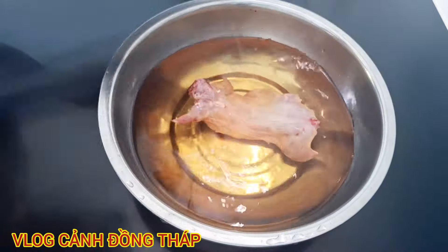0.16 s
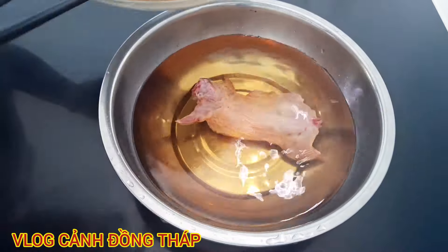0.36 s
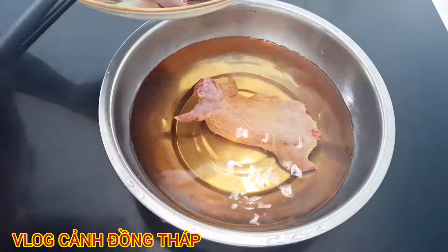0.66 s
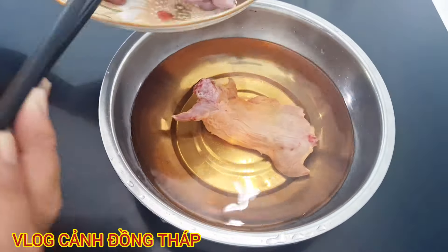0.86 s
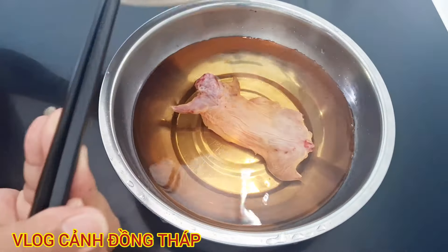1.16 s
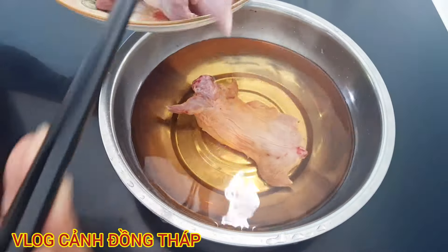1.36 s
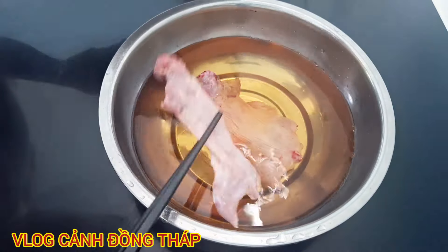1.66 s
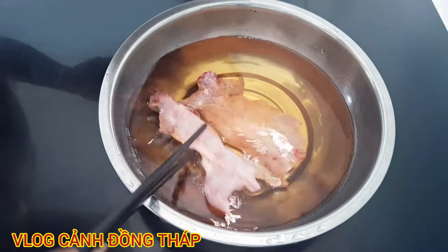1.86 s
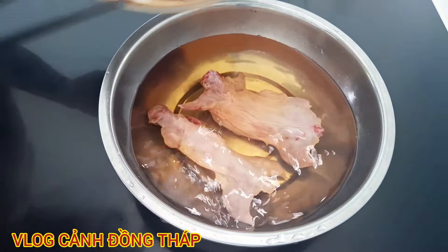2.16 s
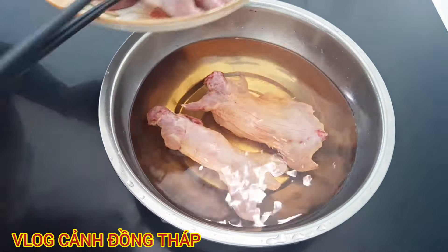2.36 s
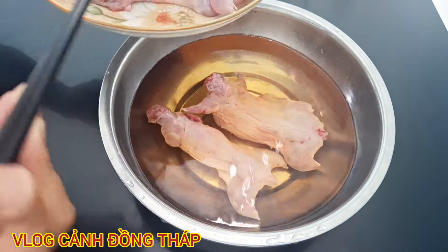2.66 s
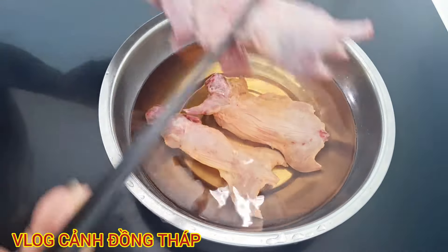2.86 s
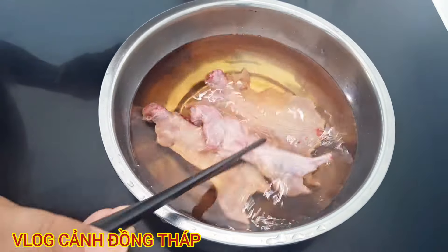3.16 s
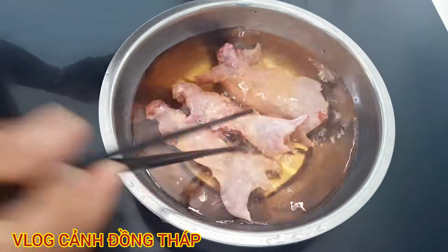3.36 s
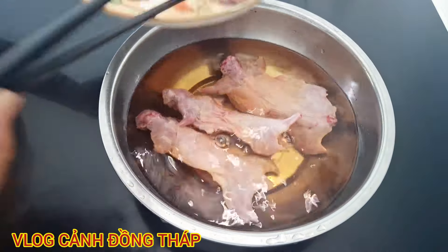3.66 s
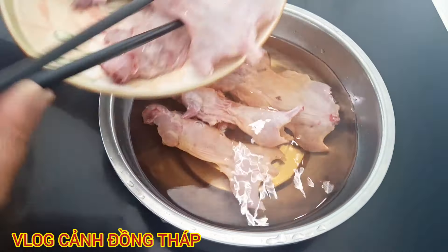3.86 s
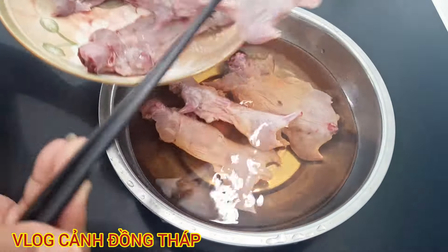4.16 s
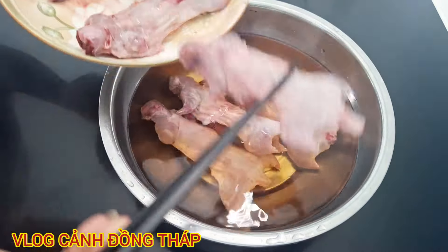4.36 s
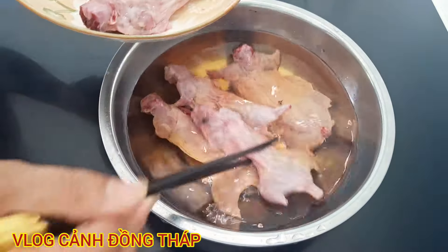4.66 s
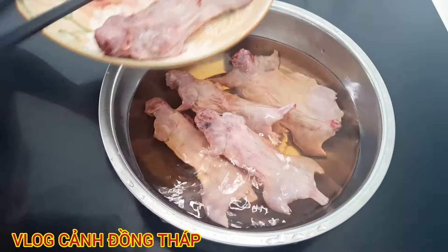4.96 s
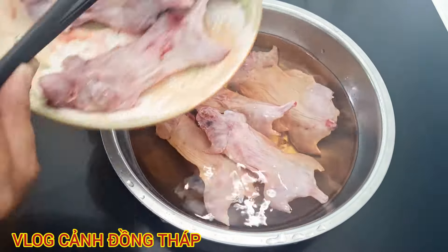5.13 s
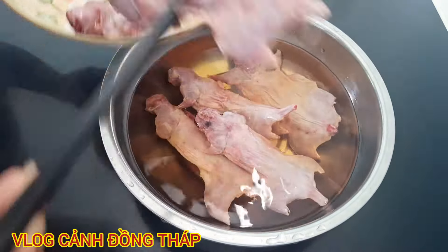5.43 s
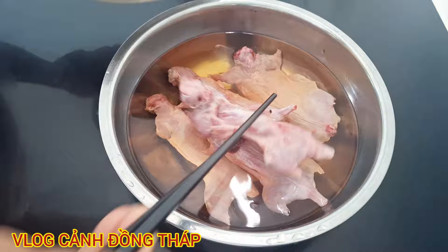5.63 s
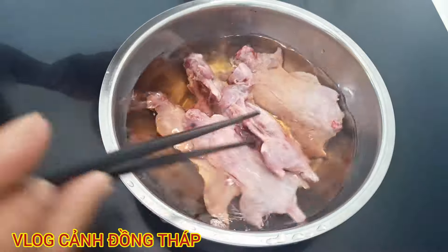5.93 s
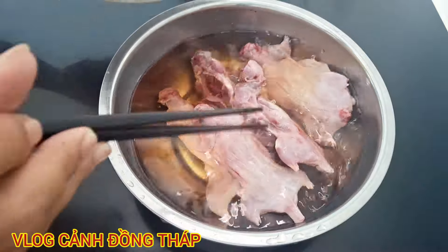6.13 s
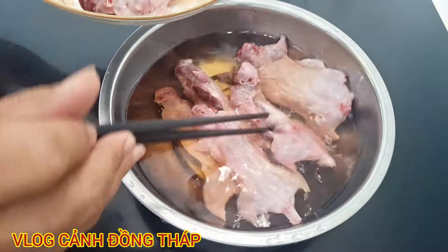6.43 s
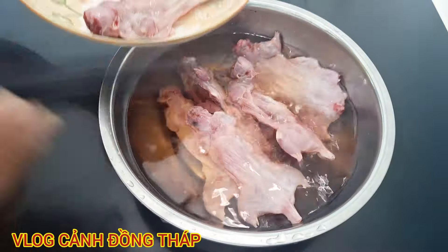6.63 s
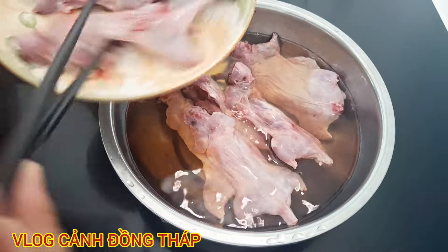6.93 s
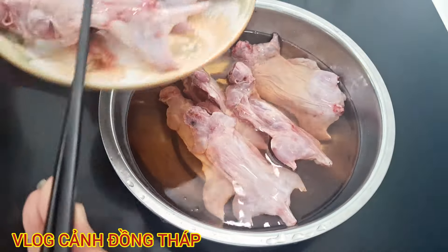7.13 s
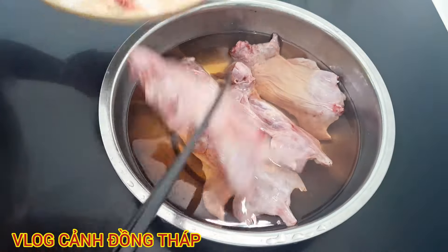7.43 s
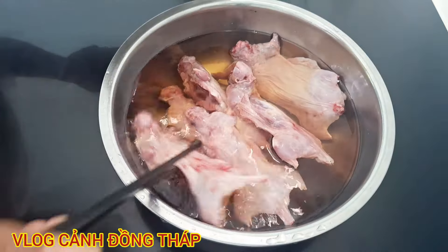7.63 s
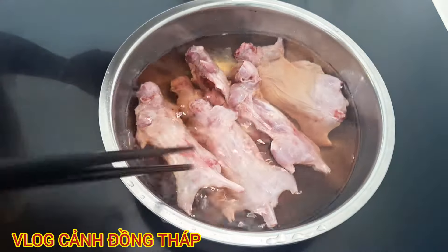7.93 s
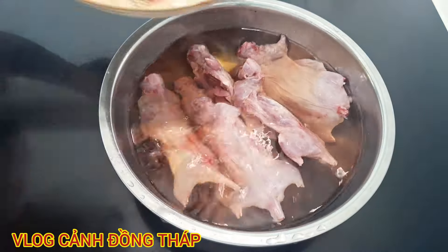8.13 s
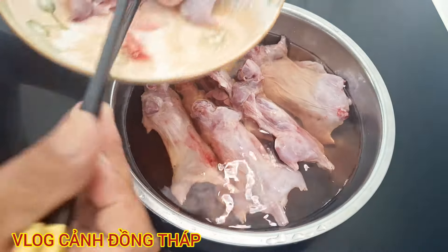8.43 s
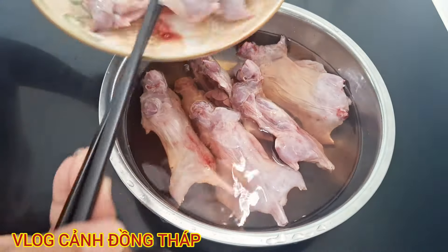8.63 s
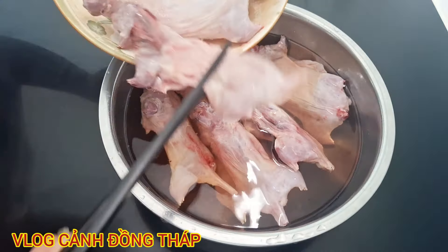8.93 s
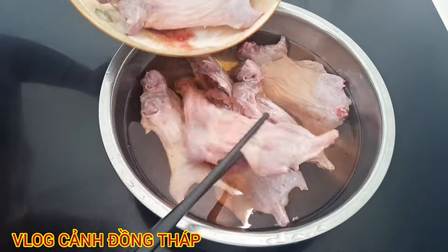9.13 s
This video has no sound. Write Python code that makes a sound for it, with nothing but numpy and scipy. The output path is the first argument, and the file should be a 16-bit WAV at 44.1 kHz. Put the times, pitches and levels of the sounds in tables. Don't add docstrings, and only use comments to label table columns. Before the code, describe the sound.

Close view of a quiet, bare kitchen. Short, bright ceramic clinks come irregularly, the strongest chattering and skidding briefly. Much fainter wet ticks, tiny clicks of stick on stick and soft rubbing of meat fill the gaps, busiest just before eight seconds with a slight steel ring, then small bubble blips. Low hum, thin whine and distant rumble continue underneath.

```python
import sys
import numpy as np
from scipy import signal
from scipy.fft import rfft, irfft, next_fast_len
from scipy.io import wavfile
from scipy.ndimage import map_coordinates

SR = 44100
rng = np.random.default_rng(int(sys.argv[2]) if len(sys.argv) > 2 else 0)


def materialize(psi):
    bounded = np.clip(np.atleast_2d(psi).T, -1, 1)
    quanta = np.round(bounded * 32767).astype(np.int16)
    wavfile.write(sys.argv[1], SR, quanta)


def boost(x):
    u = np.asarray(x, float) / 20
    return 10 ** u


N = 409688

# (time [s], peak level [dB], 1.8 kHz family [dB], 3 kHz family [dB], 4 kHz family [dB])
TAPS = [(0.464, -24.5, -12.5, -10.5, -8.5), (2.2731, -17, -20.5, -7, -9.5), (2.29, -33, -2, -8.5, -19),
        (2.3217, -31, -21, -3, -15), (2.4705, -30.5, -22, -9, -17), (3.996, -60, -16, -17, -13),
        (4.154, -61, 1, -4, -7), (4.468, -48, -30.5, -29.5, -14), (6.8963, -17.5, -42, 2, -13.5),
        (7.1188, -23, -3.5, -7, -6), (7.1313, -40.5, 11, -27, -3), (8.6617, -46, 11, 13.5, 0.5),
        (8.6737, -58.5, 25.5, -13, -17), (8.8666, -58.5, 0, -3, -21), (8.9121, -54, 4, -2, -8)]
# (5 kHz [dB], 6 kHz [dB], 7.5 kHz [dB], treble [dB], upper twin [dB])
TAP_FAMILIES = [(-6, 1, 0.5, -8.5, 3.5), (-11.5, -2, -4, -2.5, -3.5), (-14.5, 2.5, 3, -6.5, -4),
                (-12, -5.5, -6.5, -4, -5), (-14, -6, -6, -16, 5.5), (-9, -2, 0, -8, 0),
                (-9, 4, -3, -13, -2), (-10.5, 2.5, 1.5, -6, 2), (-16.5, -2, 2.5, -4, 3.5),
                (-14.5, 1, -6.5, -4.5, 2), (-5, -3, 3.5, -7, -2), (-6, 8.5, 3, 5.5, 2.5),
                (-5, 4, -4, -9, 1), (-10.5, -1, 0, -1, 4.5), (-11, 1, 3, -4, 3.5)]
# (frequency [Hz], level [dB], T60 [s], twin weight [negative lower, positive upper])
PLATE_MODES = [(955, -40, 0.043, 0.5), (1190, -36.5, 0.12, -3), (1322, -25, 0.023, 1),
               (1775, -5.5, 0.048, -0.5), (1856, -5.5, 0.045, -0.5), (2030, -34.5, 0.074, 2),
               (2300, -24.5, 0.042, 0), (2500, -22.5, .04, -2), (2825, -23.5, 0.018, 0.5),
               (3007, -14.5, 0.085, 0), (3113, -6.5, 0.098, 0), (3460, -15.5, 0.02, 2),
               (3655, -20.5, 0.055, -2.5), (4015, 7, 0.055, 0), (4023, -0.5, 0.046, -0.5),
               (4170, -5, .04, -2), (4370, -19, .06, -0.5), (4860, -6.5, .04, 1.5), (5065, -2.5, .05, -1.5),
               (5130, -2, 0.059, 1.1), (5230, -3.5, 0.11, 1), (5870, -14, .04, 1), (5540, -17.5, .03, -.5),
               (6080, -8.5, 0.029, 0), (6338, -3, 0.018, 0.5), (6410, -8.5, .05, 1.5),
               (6650, -18.5, 0.046, -0.5), (7050, -14, 0.03, 2), (7380, -17, .04, -2.5),
               (7500, -15.5, 0.074, -1.5), (7640, -16, 0.07, 1.5), (7734, -13.5, 0.1, 0),
               (8000, -30, .05, 0.5), (8630, -24.5, 0.034, 0), (9210, -18, 0.04, -1.5),
               (10200, -28.5, 0.022, -2.5), (10300, -28, .04, 1.5), (10800, -21.5, 0.044, 0.5),
               (11340, -20.5, .04, 0.5), (11560, -28, .03, 0), (12460, -17, 0.035, 0),
               (12900, -23, .035, -.5), (14200, -24.5, .02, 0), (15280, -32, 0.044, 1)]
# (lower edge [Hz], upper edge [Hz])
FAMILIES = [(1600, 2000), (2850, 3250), (3800, 4300), (4800, 5900), (6000, 6600), (7200, 8000),
            (8000, 16000), (2850, 3030)]
# (time [s], length [s], level [dB], 3 kHz family [dB], 4 kHz family [dB])
DRAGS = [
    (0.544, 0.02, -40, -1, -2.5),
    (2.286, 0.033, -42, -4, -10),
    (2.295, 0.039, -44, 5.5, 2),
    (2.335, 0.057, -48, 4.5, -37),
    (2.41, 0.086, -63, -9, 12),
]
# (1.8 kHz [dB], 5 kHz [dB], treble [dB], lower 3 kHz twin [dB], upper twin [dB])
DRAG_FAMILIES = [(-6.5, -1, -6, 14, -0.5), (-3.5, -8, 5, 2, 4.5), (-4, 2, 2.5, 0, -1), (-2, -12, 0, 1, 2.5),
                 (-2.5, -7, -2, 1, 4)]
# (time [s], peak level [dB])
THUMPS = [
    (0.464, -59),
    (0.555, -58),
    (2.274, -52.5),
    (2.299, -50.5),
    (2.329, -66.5),
    (4.156, -60.5),
    (6.896, -50),
    (7.118, -55),
    (8.662, -51.5),
    (8.915, -61),
]
# (time [s], peak level [dB])
RIM_TAPS = [
    (8.4032, -18.5),
]
# (frequency [Hz], level [dB], T60 [s])
RIM_MODES = [(1840, -20.5, 0.08), (2590, -29.5, 0.13), (3124, -8, 0.052), (3430, -13.5, 0.03),
             (4200, -22, 0.046), (4920, -6.5, 0.029), (5230, -2, 0.04), (6140, -27, .05),
             (6450, -22, 0.065), (7050, -21, .06), (7480, -10, 0.032), (8650, -29, 0.07), (10320, -28, .03),
             (11400, -20.5, 0.032), (12800, -23, 0.049), (15300, -26, .03)]
# (time [s], peak level [dB], centre [Hz], width [octaves])
RATTLE = [(0.003, -53.5, 620, 0.74), (0.556, -41, 1110, 3.2), (2.287, -32.5, 3485, 2.6),
          (2.2882, -32, 2300, 4.3), (2.293, -34, 4970, 2.4), (2.2988, -29.5, 3930, 1.8),
          (2.3035, -30.5, 3500, 3.5), (2.3062, -34, 5040, 1.9), (2.317, -37, 3630, 1.9),
          (2.322, -31.5, 4480, 1.3), (2.323, -28.5, 5190, 1.5), (2.328, -32.5, 4600, 1.6),
          (2.333, -34.5, 4500, 0.97), (2.345, -34, 2210, 1.8), (2.348, -31, 2980, 2.2),
          (2.367, -40, 2500, 2.7), (4.156, -53.5, 1660, 2.1)]
# (time [s], peak level [dB], centre [Hz], width [octaves])
TICKS = [(1.035, -53, 7320, 0.78), (1.1155, -55, 4560, 2.2), (2.0583, -48, 6900, 0.59),
         (3.1535, -43.5, 6500, 1.5), (3.165, -47, 4200, 1.2), (3.164, -42, 13500, 1),
         (3.198, -55, 7300, 0.44), (3.206, -45, 5930, 1.2), (3.2125, -51, 5900, 0.91),
         (3.239, -62, 6300, .3), (3.3718, -60, 6190, 0.52), (4.0377, -55, 6950, 0.54),
         (4.089, -54, 5070, 1.2), (4.6058, -49, 6440, 0.99), (4.655, -41, 5400, 1.3), (4.665, -49, 4500, 2),
         (4.735, -58, 5500, 1.5), (7.6961, -56, 4400, .6), (7.825, -31.5, 2940, 2.3),
         (7.951, -44, 4230, 0.8), (6.347, -49.5, 5760, 0.56), (7.6322, -36, 5450, 3),
         (7.649, -49, 6950, 0.77), (7.711, -36, 7000, 1), (7.7155, -34.5, 6900, 0.51),
         (7.776, -46, 6950, 0.61), (8.55, -56, 6300, .5), (8.175, -55, 3000, 0.99),
         (7.8236, -30, 6600, 2.4), (7.874, -44, 7380, 1.3), (7.9527, -37, 7000, 1),
         (7.959, -38, 7200, 0.77), (8.1037, -46, 6670, 1.3), (3.8464, -50, 5400, 0.99),
         (3.366, -54, 4500, 2.5), (0.945, -57, 7500, 0.83), (8.6615, -34, 2120, 1.7)]
# (time [s], peak level [dB], centre [Hz])
SPITS = [(0.807, -51, 12100), (1.042, -62, 11500), (1.26, -59, 11600), (1.8831, -58.5, 11400),
         (3.1794, -47.5, 11200), (3.204, -52, 15000), (3.242, -55, 12100), (3.414, -57.5, 9500),
         (3.6553, -63, 15300), (3.916, -59, 15000), (4.2243, -57, 11600), (4.6059, -52, 12540),
         (4.654, -53, 11400), (4.6937, -50, 9450), (5.2335, -65.5, 10970), (6.3131, -49, 11400),
         (6.5194, -50, 9800), (7.9097, -49, 11600)]
# (time [s], peak level [dB], centre [Hz])
KNOCKS = [
    (0.9373, -57, 3700),
    (3.204, -46.5, 3450),
    (4.357, -57, 4000),
    (4.662, -51, 4030),
    (5.5188, -59.5, 4900),
    (5.886, -46, 4400),
    (5.9185, -40.5, 3700),
    (6.3203, -48, 4180),
]
# (frequency [Hz], gain [dB])
CAPSULE = [(20, 3), (7900, -1), (8400, -11), (15300, 0.5), (15800, -22), (20000, -47)]
# (time [s], length [s], level [dB])
PEELING = [(0.79, 0.14, -76), (1.021, 0.04, -76), (2.248, .012, -74), (3.16, 0.065, -75),
           (3.187, 0.11, -83), (3.905, 0.071, -78), (4.652, 0.067, -62.5), (4.7, 0.095, -82),
           (7.628, .04, -61), (7.847, 0.085, -70), (4.6, .02, -70)]
# (time [s], length [s], level [dB])
PRESSING = [(0.0, 0.029, -67), (1.752, 0.11, -77), (1.872, 0.1, -70), (2.12, 0.14, -88),
            (3.847, 0.045, -85), (4.214, 0.13, -77), (4.599, 0.02, -58), (4.688, 0.15, -79),
            (4.86, 0.54, -80.5), (5.754, 0.18, -89), (5.812, 0.03, -67.5), (5.877, 0.073, -62),
            (5.961, 0.09, -71.5), (6.802, 0.064, -77), (8.183, 0.57, -78.5)]
# (time [s], level [dB])
PRODS = [
    (6.09, -65.5),
    (6.192, -73),
    (6.28, -69),
    (6.438, -68),
    (6.5, -68.5),
    (6.581, -66.5),
    (6.678, -65.5),
]
# (time [s], length [s], level [dB])
SLIDING = [
    (0.39, 0.089, -94),
    (2.045, 0.041, -57),
    (7.709, 0.021, -51),
    (7.743, 0.068, -54),
    (7.822, 0.016, -42.5),
    (7.95, 0.024, -54),
    (7.98, 0.051, -68),
    (8.108, 0.063, -64.5),
]
# (frequency [Hz], density [dB per Hz])
PEEL_SPECTRUM = [(1470, -20.5), (2800, -14.5), (3600, -4), (5200, -0.5), (6750, 1.5), (8000, -7.5),
                 (11000, -43.5), (18700, -120)]
PRESS_SPECTRUM = [(1470, -21), (2500, -13), (3560, -5.5), (5600, -12.5), (6750, -1.5), (8500, -18),
                  (11000, -46.5), (18700, -120)]
SLIDE_SPECTRUM = [(1470, -26), (3000, -13), (4200, -3.5), (5600, -15), (6700, -4), (7300, -2.5),
                  (8300, -19), (11000, -38.5), (18700, -120)]
FIZZ_SPECTRUM = [(5000, -52.5), (8500, -19.5), (10300, -1), (11600, 7.5), (15500, -11.5), (16000, -15)]
# (time [s], level [dB], floor over wall [dB])
BOWL_TAPS = [
    (7.712, -54.5, -6),
    (7.75, -60, 3),
    (7.766, -60, 9),
    (7.829, -66, -6),
]
# (frequency [Hz], level [dB], T60 [s], side [-1 wall to 1 floor])
BOWL_MODES = [(2816, -1, 0.12, 0), (3460, -7.5, 0.098, -1), (3900, -6, 0.15, -.5), (4640, -7, 0.18, 1),
              (5400, -14, 0.14, -1), (6620, -2, .2, .6), (7200, 3, 0.17, .6)]
# (time [s], peak level [dB], frequency [Hz], rise [octaves], T60 [s])
BUBBLES = [
    (.395, -76, 6850, .4, .5),
    (8.595, -62, 1200, .05, .03),
    (3.263, -58, 1400, 2.5, .11),
    (3.365, -64, 2100, 2.2, .1),
    (8.175, -47, 2180, .02, .045),
    (8.175, -54, 1050, .02, .035),
    (8.13, -61, 1650, .05, .05),
    (4.603, -55, 1300, .05, .025),
    (7.823, -48, 1300, .6, .02),
    (7.632, -55, 1500, .3, .015),
]
# (frequency [Hz], gain [dB])
WALLS = [(400, 6.5), (1800, 0), (3000, -3.5), (5000, -4.5), (7500, -3.5), (12000, 0.5), (16000, -1.5)]
# (frequency [Hz], T60 [s])
REVERBERATION = [(500, .6), (1500, 0.81), (4000, 0.7), (9000, 0.6), (15000, 0.26)]
# (time [s], length [s], level [dB])
HUM = [
    (0.312, 1, -73.5),
    (1.688, 1.32, -73.5),
    (3.124, 1.04, -67),
    (4.22, 0.66, -73),
    (4.97, 1.3, -72),
    (6.328, 0.48, -66.5),
    (7, 0.84, -76),
    (7.98, 0.38, -75),
    (8.5, 0.93, -78),
]
# (frequency [Hz], rms level [dB])
WHINE = [(3731, -93.5), (3822, -92.5), (3871, -92), (3908, -82.5), (4000, -85.5), (4091, -90),
         (4183, -91.5), (4274, -77.5)]
# (frequency [Hz], width [Hz], level [dB])
HOUSING = [(3770, 310, -2.5), (4180, 160, 2)]
# (time [s], level [dB])
RUMBLE_LEVEL = [(0.0, -69.5), (2.14, -68), (3.15, -71), (3.72, -67.5), (5.3, -70), (5.82, -67),
                (7.12, -67.5), (7.5, -68.5), (8.64, -70), (9.29, -67.5)]
# (frequency [Hz], density [dB per Hz])
RUMBLE = [(12, -62.5), (20, -25), (45, -3), (64, 1.5), (146, -3), (183, -6), (219, -8.5), (289, -17.5),
          (350, -17.5), (460, -43), (770, -120)]
AIR = [(150, -37), (250, -3.5), (291, -13), (413, -1), (441, -5.5), (481, -1.5), (619, -9.5), (1470, -7),
       (3400, -18), (4420, -53), (7480, -120)]
HISS = [(1760, -50), (3000, -35), (3580, -13.5), (3770, -6), (4250, -5.5), (4430, -8), (4530, -5),
        (5110, -18.5), (7240, -13.5), (8710, -31), (10100, -33), (11600, -23.5), (12500, -32), (15400, -27),
        (16400, -47)]
# (frequency [Hz], left over right [dB])
PORTS = [(40, 1), (180, -3), (400, 0.5), (4400, 0.5), (6000, 2.5), (7200, 9.5), (8000, 10), (8800, -2.5),
         (10000, -8.5), (11800, -6.5), (13000, 3.5)]
# (frequency [Hz], level [dB])
APART = [(30, -24), (200, -15), (500, -20), (1200, -28), (4500, -41.5), (6000, -18.5), (8000, -5.5),
         (10000, -1), (11800, -4), (12600, -19), (15000, -25.5)]

THUMP_HZ, HUM_HZ, MOTOR_TURNS_HZ = 637, 184, 45.5
TICK_T60, SPIT_T60, KNOCK_T60, RATTLE_T60 = 0.026, 0.0166, 0.013, 0.018
SPIT_OCTAVES, KNOCK_OCTAVES = 0.45, 0.54
RATTLE_DULL_DB, RATTLE_DAMPING = -17, 1.6
PROD_S = 0.099
PEEL_FIZZ_DB, PRESS_FIZZ_DB, SLIDE_FIZZ_DB = -8, -14.5, -18.5
HUM_EDGE_S, HUM_FADE_DB = 0.11, 1
AIR_DB, HISS_DB = -69, -77


def unit(x):
    return x / np.sqrt(np.mean(x ** 2) + 1e-20)


def along(points, hz):
    f, v = np.transpose(points)
    return np.interp(np.log(hz + 1), np.log(f + 1), v)


def wobble(rate):
    knots = rng.standard_normal(int(N * rate / SR) + 4)
    return map_coordinates(knots, [np.arange(N) * rate / SR])


def filtered(x, response):
    m = next_fast_len(x.shape[-1] + 4096)
    spectrum = rfft(x, m) * response(np.fft.rfftfreq(m, 1 / SR))
    return irfft(spectrum, m)[..., :x.shape[-1]]


def noise(spectrum, source=None):
    if source is None:
        source = rng.standard_normal(N)
    return unit(filtered(source, lambda hz: boost(along(spectrum, hz))))


def resonances(peaks):
    def response(f):
        total = 0
        for k, (centre, width, db) in enumerate(peaks):
            loss = 1j * f * width
            total = total + (-1) ** k * boost(db) * loss / (centre * centre - f * f + loss)
        return total
    return response


def add(track, s, sound):
    part = track[round(s * SR):][:len(sound)]
    part += sound[:len(part)]


def ring(hz, db, t60, rise=0.0014, scatter_db=0.7, wash_db=0.0, dip_db=9):
    t = np.arange(SR // 5) / SR
    db = db + scatter_db * rng.standard_normal(len(hz))
    phase = hz[:, None] * t + rng.random((len(hz), 1))
    modes = boost(db[:, None] - 60 * t / t60[:, None]) * np.sin(2 * np.pi * phase)
    modes *= 1 - np.exp(-t * hz[:, None] / 2.0)
    wash_level = 0.64 * db + 0.28 * db.max() - 1.9 * (hz > 8000)
    outline = [(400, db[0] - 11.0), *zip(hz, wash_level), (16500, db[-1] - 13.5)]
    wash = filtered(rng.standard_normal(len(t)), lambda f: boost(along(outline, f)))
    wash *= boost(wash_db - 60 * t / 0.077)
    dip = boost(-dip_db / (1 + np.exp((0.011 - t) / 0.0021)))
    return (modes.sum(axis=0) + wash) * (1 - np.exp(-(t / rise) ** 2)) * dip


def plate_taps(hz, level, t60, twin, member):
    out = np.zeros(N)
    for (s, db, *low), (*high, twin_db) in zip(TAPS, TAP_FAMILIES):
        spot = twin_db * twin + (low + high) @ member[:-1]
        add(out, s - 0.0012, ring(hz, db + 1.0 + level + spot, t60))
    return out


def plate_drags(hz, level, t60, twin, member):
    out = np.zeros(N)
    for (s, length, db, *middle), (low, *high, twin_db) in zip(DRAGS, DRAG_FAMILIES):
        count = round(length * SR)
        slips = np.hanning(count) * rng.standard_normal(count) ** 3
        spot = twin_db * twin + [low, *middle, *high] @ member[[0, 1, 2, 3, 6, 7]]
        sound = signal.fftconvolve(slips, ring(hz, level + spot, t60, wash_db=-9.0))
        add(out, s, boost(db) * sound / np.sqrt(np.mean(sound[:count] ** 2)))
    return out


def plate_thumps():
    out, t = np.zeros(N), np.arange(SR // 10) / SR
    for s, db in THUMPS:
        decay = boost(db + 3.5 - 60 * t / 0.044) * (1 - np.exp(-t / 0.00024))
        add(out, s - 0.0015, decay * np.sin(2 * np.pi * THUMP_HZ * t))
    return out


def rim_tap():
    out = np.zeros(N)
    hz, level, t60 = np.transpose(RIM_MODES)
    for s, db in RIM_TAPS:
        add(out, s - 0.0012, ring(hz, db - 3 + level, t60, scatter_db=1.5))
    return out


def plate():
    hz, level, t60, twin = np.transpose(PLATE_MODES)
    member = np.array([(hz > low) & (hz < high) for low, high in FAMILIES])
    modes = hz, level, t60, twin, member
    return plate_taps(*modes) + plate_drags(*modes) + plate_thumps() + rim_tap()


def contacts():
    out, t = np.zeros(N), np.arange(SR // 8) / SR
    voice = resonances([(hz, RATTLE_DAMPING * 2.2 / t60, db / 2) for hz, db, t60, _ in PLATE_MODES])
    plain = lambda f: 1
    plated = lambda f: voice(f) + boost(RATTLE_DULL_DB)
    events = [(*row, TICK_T60, plain) for row in TICKS]
    events += [(*row, KNOCK_OCTAVES, KNOCK_T60, plain) for row in KNOCKS]
    events += [(*row, SPIT_OCTAVES, SPIT_T60, plain) for row in SPITS]
    events += [(*row, RATTLE_T60, plated) for row in RATTLE]
    for s, db, hz, width, t60, body in events:
        burst = rng.standard_normal(len(t)) * boost(-60 * t / t60) * (1 - np.exp(-t / 0.00041))
        burst[20] += 3
        band = lambda f: (1 + (np.log2((f + 1) / hz) / (width / 2)) ** 2) ** -1.5
        burst = filtered(np.pad(burst, (64, 0)), lambda f: body(f) * band(f))
        add(out, s - 0.002, boost(db) * burst / np.abs(burst).max())
    return out


def rustle():
    grains = rng.standard_normal(N) * boost(3.5 * wobble(300) + 1.8 * wobble(45))
    fizz, out = noise(FIZZ_SPECTRUM, grains), np.zeros(N)
    pressing = PRESSING + [(s, PROD_S, db) for s, db in PRODS]
    kinds = [(PEELING, PEEL_SPECTRUM, PEEL_FIZZ_DB),
             (pressing, PRESS_SPECTRUM, PRESS_FIZZ_DB),
             (SLIDING, SLIDE_SPECTRUM, SLIDE_FIZZ_DB)]
    for strokes, spectrum, fizz_db in kinds:
        rub = noise(spectrum, grains) + boost(fizz_db) * fizz
        for s, length, db in strokes:
            part = slice(round(s * SR), round((s + length) * SR))
            swell = np.sin(np.pi * np.linspace(0, 1, part.stop - part.start) ** 0.73)
            out[part] += swell * boost(db - 1.5) * rub[part]
    return out


def bowl():
    out = np.zeros(N)
    hz, level, t60, side = np.transpose(BOWL_MODES)
    t60 = np.clip(t60, 0.1, 0.3)
    for s, db, spot_db in BOWL_TAPS:
        spot = db + level + spot_db * side
        add(out, s, ring(hz, spot, t60, rise=0.003, scatter_db=1, wash_db=-30, dip_db=0))
    return out


def bubbles():
    out, t = np.zeros(N), np.arange(SR // 8) / SR
    for s, db, hz, rise, t60 in BUBBLES:
        pitch = hz * 2 ** (rise * t / t60)
        decay = boost(db - 60 * np.cumsum(pitch / hz) / SR / t60) * (1 - np.exp(-t / 0.00014))
        add(out, s, decay * np.sin(2 * np.pi * np.cumsum(pitch) / SR))
    return out


def kitchen(x, step):
    out = np.zeros(N)
    for start in range(0, N, step):
        hz, t, z = signal.stft(rng.standard_normal(3 * SR // 4), SR, nperseg=256)
        z = z * boost(-60 * t / along(REVERBERATION, hz)[:, None])
        tail = signal.istft(z, SR, nperseg=256)[1]
        tail *= 1 - np.exp(-(np.arange(len(tail)) / SR / 0.0064) ** 2)
        tail /= np.linalg.norm(tail)
        add(out, start / SR, signal.fftconvolve(x[start:start + step], tail))
    return out


def fridge_hum():
    t, swells = np.arange(N) / SR, np.zeros(N)
    for s, length, db in HUM:
        edges = np.clip(np.minimum(t - s, s + length - t) / HUM_EDGE_S, 0, 1)
        swells += boost(db - HUM_FADE_DB * np.clip((t - s) / length - 0.5, -1, 1)) * edges
    pitch = HUM_HZ + 2.6 * wobble(2.5) + 1.5 * wobble(12)
    return np.sqrt(2) * swells * boost(2.0 * wobble(13)) * np.sin(2 * np.pi * np.cumsum(pitch) / SR)


def fridge_whine():
    t, out = np.arange(N) / SR, np.zeros(N)
    for hz, db in WHINE:
        level = np.sqrt(2) * boost(db - 0.8 + 1.5 * wobble(3.8))
        out += level * np.sin(2 * np.pi * hz * t + 0.92 * wobble(9))
    return out


def fridge_housing():
    t = np.arange(N) / SR
    turning = 1 + 1.1 * np.sin(2 * np.pi * MOTOR_TURNS_HZ * t + 2.1 * wobble(5))
    housing = resonances(HOUSING)
    return boost(-78.5) * unit(filtered(turning * rng.standard_normal(N), lambda f: housing(f) ** 2))


def distance():
    s, db = np.transpose(RUMBLE_LEVEL)
    rumble_db = np.interp(np.arange(N) / SR, s, db) + 3.0 + 0.64 * wobble(4)
    air_db = AIR_DB + 1.1 * wobble(8.0) + 0.78 * wobble(1.89)
    return boost(rumble_db) * noise(RUMBLE) + boost(air_db) * noise(AIR) + boost(HISS_DB) * noise(HISS)


def scene():
    touches = filtered(contacts(), lambda hz: boost(along(CAPSULE, hz)))
    near = plate() + bowl() + touches + rustle()
    thrown = filtered(near, lambda hz: boost(along(WALLS, hz)))
    fridge = fridge_hum() + fridge_whine() + fridge_housing()
    shared = near + bubbles() + boost(-6.5) * kitchen(thrown, SR // 3) + distance() + fridge
    unshared = boost(-13.5) * kitchen(thrown, N) + distance()
    unshared = filtered(unshared, lambda hz: boost(along(APART, hz)))
    return np.array([shared + unshared, shared - unshared])


def band_limit(x):
    return signal.sosfilt(signal.butter(12, 16550, fs=SR, output="sos"), x)


def record(dry):
    left = lambda hz: 1 / (1 + boost(-along(PORTS, hz)))
    top = lambda hz: boost(-14 * np.clip((hz - 15480) / 120, 0, 1))
    mix = filtered(dry, lambda hz: 2 * top(hz) * np.array([left(hz), 1 - left(hz)]))
    return band_limit(mix)


dry = scene()
out = record(dry)
materialize(out)
```